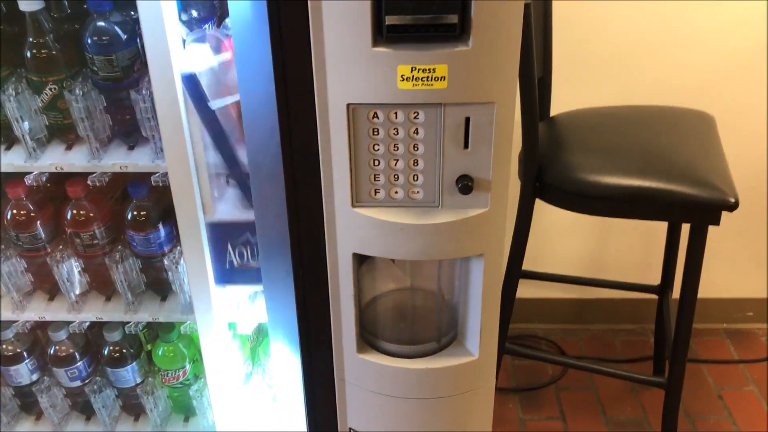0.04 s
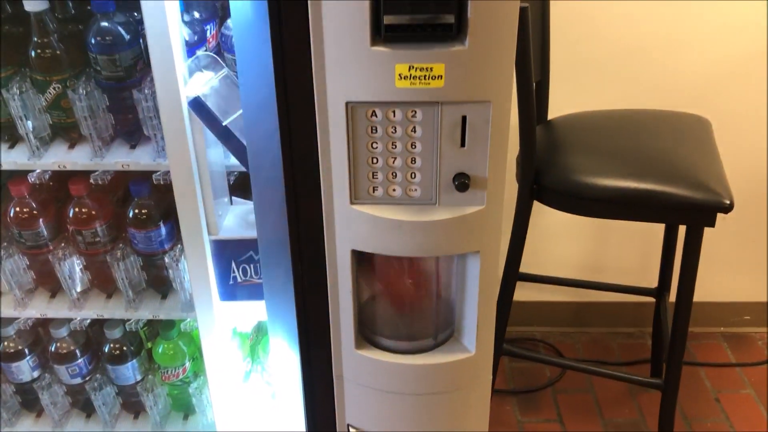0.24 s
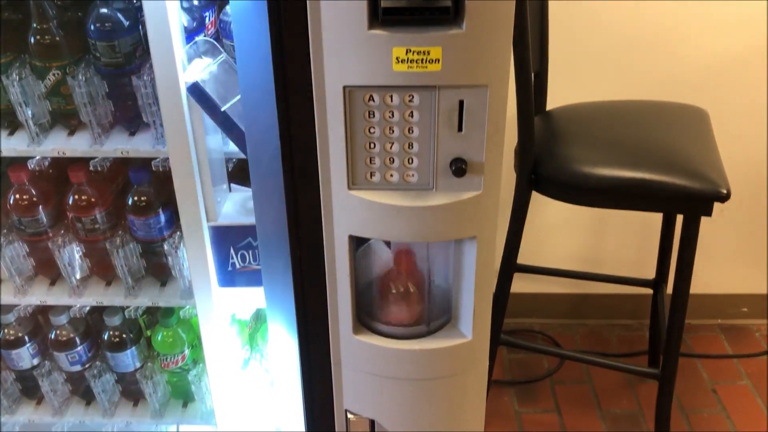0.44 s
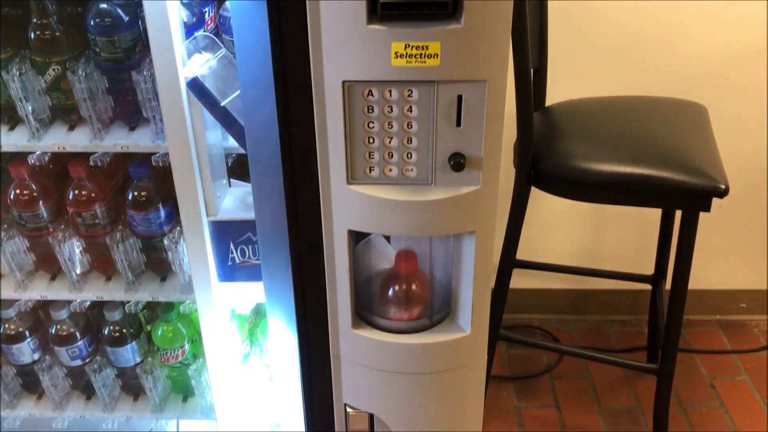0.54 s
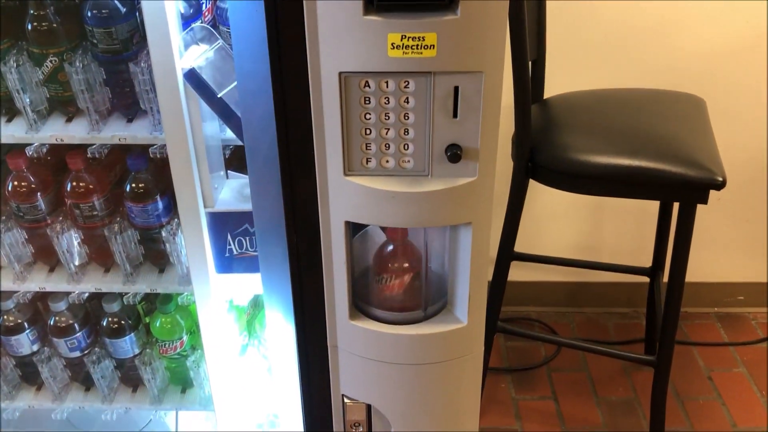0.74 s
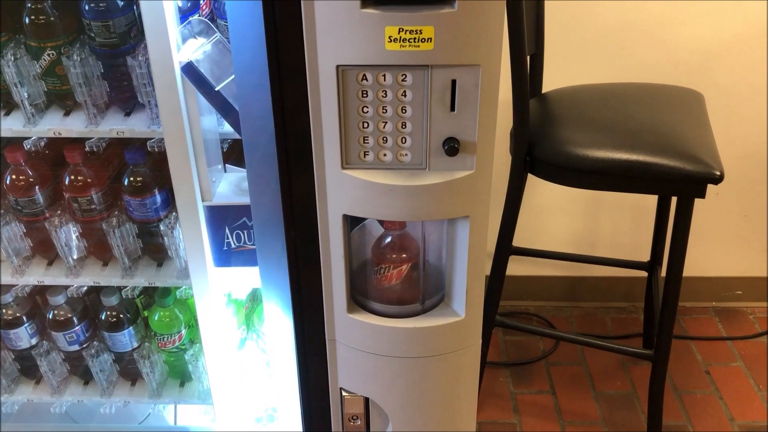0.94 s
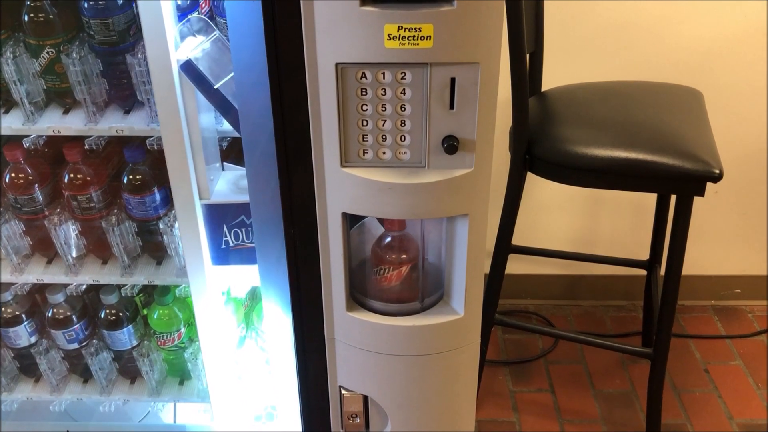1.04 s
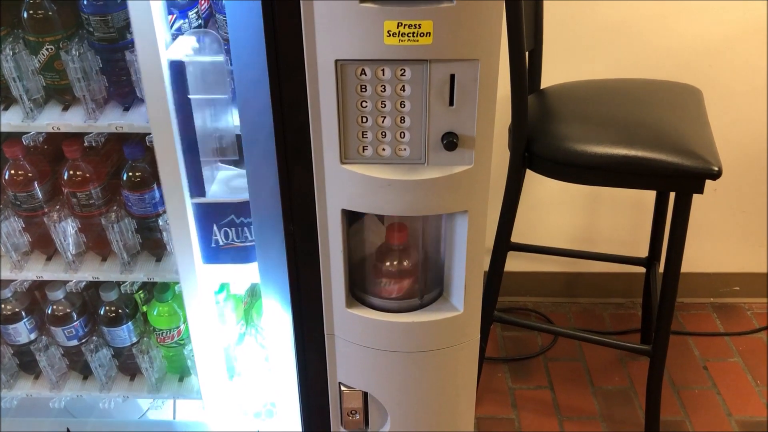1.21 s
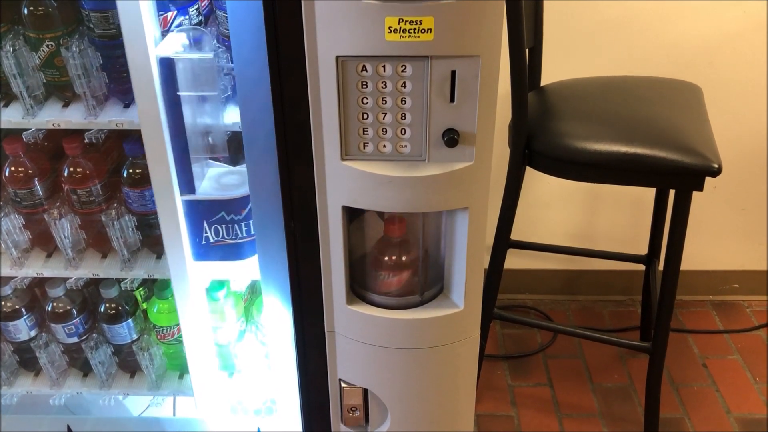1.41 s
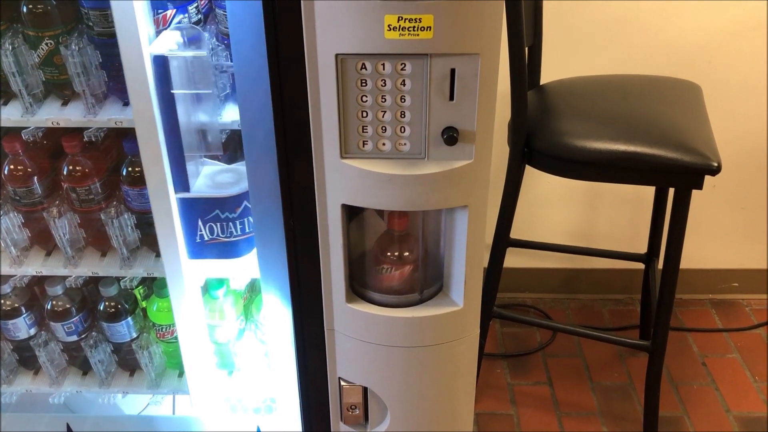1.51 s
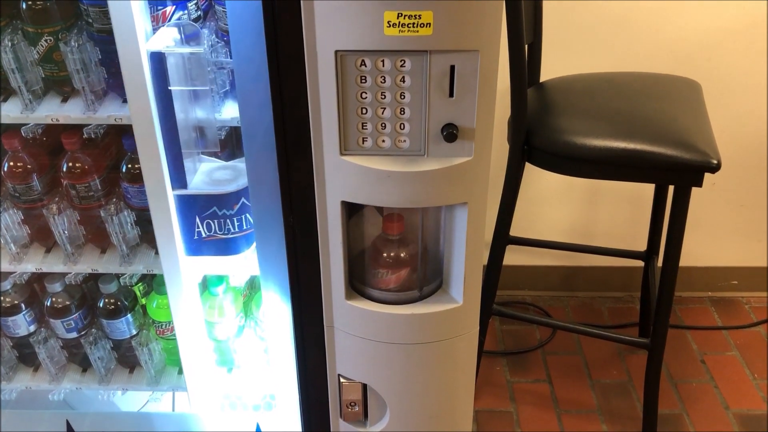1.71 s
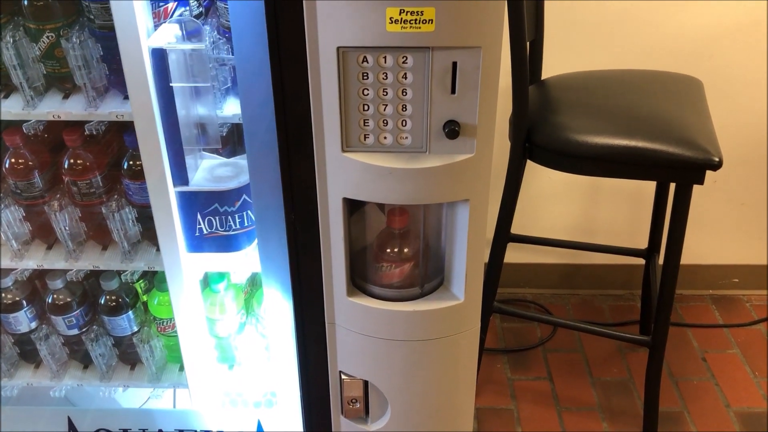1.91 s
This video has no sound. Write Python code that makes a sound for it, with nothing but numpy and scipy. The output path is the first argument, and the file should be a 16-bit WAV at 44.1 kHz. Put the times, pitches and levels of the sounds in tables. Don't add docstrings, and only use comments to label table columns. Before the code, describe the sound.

A full plastic bottle clatters and thuds down into a vending machine's port, then a latch clunks

```python
import sys
import numpy as np
from scipy import signal
from scipy.fft import rfft, irfft
from scipy.io import wavfile
from scipy.ndimage import uniform_filter1d

SR = 44100
rng = np.random.default_rng(int(sys.argv[2]) if len(sys.argv) > 2 else 0)


def linear_from_db(decibels):
    return 10 ** (np.asarray(decibels, float) / 20)


def store_wav(level_fs):
    pcm = np.round(np.clip(np.atleast_2d(level_fs), -1, 1) * 32767)
    wavfile.write(sys.argv[1], SR, pcm.T.astype(np.int16))


N = 85995

# pitch_hz, level_db
COMPRESSOR_TONES = [(156.1, -57.5), (242.2, -62), (371.4, -55), (866.7, -83.5)]
# pitch_hz, level_db
FAN_COLOUR = [(30, -16.5), (70, -6.5), (150, -1.5), (250, 0.5), (380, -3.5), (500, -12), (1500, -25.5),
              (2500, -36), (5000, -39.5), (16000, -61.5)]
# start_s, level_db, body_db, treble_db, chatter_s
BOTTLE_BLOWS = [(0.0792, -41.5, -12, -10.5, 0.014), (0.145, -58, -27, -13.5, 0.0051),
                (0.157, -40.5, -13.5, -12, 0.0063), (0.2258, -22, -22.5, -14, 0.011),
                (0.282, -25.5, -15.5, -3.5, 0.012), (0.2902, -24, 1.5, -18, 0.0042),
                (0.312, -24, 0, -9, 0.008), (0.331, -25.5, -14.5, -22, 0.0072),
                (0.3685, -24.5, -4.5, -31.5, 0.0025), (0.3824, -30.5, 3, -14, 0.016),
                (0.4075, -21.5, -15, -11, 0.013), (0.4192, -33.5, 7, -10.5, 0.012),
                (0.4292, -19, -10, -23, 0.01), (0.4506, -26, 1, -11, 0.019),
                (0.461, -25.5, -11, -9.5, 0.0083), (0.4844, -25.5, -4.5, -16.5, 0.0047),
                (0.508, -36, -18.5, -1.5, 0.0044), (0.5202, -23, -2.5, -34, 0.016),
                (0.5412, -26, 1.5, -22, 0.013), (0.5603, -22.5, -9, -18, 0.005),
                (0.582, -25.5, -14, -40, 0.016), (0.6134, -28.5, 1, -14, 0.012),
                (0.6358, -32, -2, -8.5, 0.0086), (0.6564, -30, -7, -5.5, 0.0036)]
# start_s, level_db, body_db, treble_db, chatter_s
LATCH_CLUNKS = [
    (1.2041, -27, -18, -15.5, 0.0058),
    (1.245, -41, -18, -29.5, 0.0075),
    (1.323, -33.5, -6.5, -9, 0.01),
    (1.3283, -34.5, -8, -3.5, 0.011),
    (1.3674, -29, -40, -6.5, 0.0093),
    (1.3894, -43.5, -10, -15.5, 0.0053),
]
# start_s, peak_db, pitch_hz, t60_s (time to fall 60 dB)
METAL_PINGS = [(.082, -46, 1671, 0.14), (.229, -39, 2010, 0.18), (.229, -38, 1184, 0.043),
               (.288, -27, 588, 0.13), (.29, -28, 3180, 0.055), (.312, -33, 3230, 0.046),
               (.313, -26, 544, 0.051), (.369, -23.5, 2060, 0.017), (.374, -16.5, 938, 0.023),
               (.38, -23.5, 1020, 0.092), (.408, -23, 1320, 0.034), (.41, -23.5, 1009, .06),
               (.445, -21, 1022, 0.055), (.464, -24, 570, 0.076), (.465, -32, 6500, 0.035),
               (.465, -33.5, 10000, 0.051), (.523, -25, 997, 0.092), (.556, -27, 596, 0.065),
               (.586, -24.5, 1007, 0.056), (.664, -25.5, 646, 0.059), (.69, -34.5, 790, 0.055),
               (1.132, -60, 3410, 0.021), (1.14, -64, 1350, 0.16), (1.206, -35, 877, 0.13),
               (1.206, -38, 2622, 0.15), (1.206, -45, 1660, 0.044), (1.206, -41.5, 4374, 0.11),
               (1.206, -48, 5250, 0.11), (1.328, -39.5, 5200, 0.051), (1.37, -59, 5080, 0.36),
               (1.37, -52, 1484, 0.37), (1.37, -52, 2040, 0.32), (.508, -35, 5140, 0.022),
               (.617, -33, 2480, 0.029)]
# start_s, peak_db, pitch_hz, t60_s
PANEL_THUMPS = [(.283, -23, 82, 0.11), (.402, -32, 86, .1), (.432, -16.5, 150, 0.066),
                (.442, -19.5, 74.6, 0.091), (.452, -23.5, 359, .07), (.606, -20, 170, 0.061),
                (.61, -24, 88.5, 0.13), (.632, -25.5, 162, .09), (.59, -28, 357, 0.075),
                (.645, -32, 425, 0.085), (.3, -31.5, 257, 0.11), (.68, -44, 111, 0.059),
                (.72, -34, 79, 0.1), (1.215, -42, 80, 0.18), (1.262, -40, 65, 0.14),
                (1.288, -42, 83.5, 0.16), (1.325, -37, 446, 0.066), (1.343, -31.5, 430, 0.14),
                (1.343, -34, 202, 0.047), (1.368, -30, 277, 0.06), (.408, -25, 230.5, 0.14),
                (1.385, -34.5, 60, 0.13), (1.394, -31, 233, 0.053), (1.413, -35, 283, 0.15),
                (1.432, -40, 131.6, 0.17), (1.388, -34, 171, .08), (1.41, -34, 185, 0.12)]
# time_s, level_db
RATTLE_CURVES = [
    [(.085, -56.5), (.14, -52.5), (.22, -46.5), (.27, -41), (.355, -38.5), (.45, -36.5), (.6, -34.5),
     (.68, -40.5), (.76, -80)],
    [(1.21, -42), (1.27, -52), (1.31, -55), (1.35, -40.5), (1.42, -48.5), (1.5, -74.5)],
]
# start_s, level_db, contact_s
CABINET_THUDS = [(0.1, -34.5, 0.0046), (0.149, -35.5, 0.004), (0.19, -34.5, 0.0026), (0.287, -28.5, 0.0039),
                 (0.321, -38, 0.0031), (.38, -29.5, 0.0021), (0.411, -29.5, 0.0036), (.437, -36, 0.0034),
                 (0.454, -33.5, 0.0032), (0.534, -45, 0.0094), (0.556, -30, 0.004), (.612, -34.5, 0.0017),
                 (0.659, -29.5, 0.0046), (0.722, -36, 0.0045), (1.217, -45, 0.0045), (1.255, -36.5, 0.0034),
                 (1.299, -28, 0.0066), (1.334, -37, 0.0048), (1.371, -38.5, 0.002), (1.393, -33, 0.0047),
                 (1.442, -40, 0.0029)]
# start_s, level_db
LOOSE_TICKS = [(.138, -48.5), (.187, -55), (0.263, -43), (0.702, -57), (0.75, -64), (0.8, -58.5),
               (.833, -62), (0.872, -59.5), (0.933, -65), (1.094, -73), (1.128, -57.5), (1.189, -66),
               (1.312, -50.5)]
# pitch_hz, level_db
CHUTE_LOW = [(517, -1), (586, -1), (683, 1), (716, -5), (830, -3.5), (921, -1.5), (964, -5.5), (1023, -2.5),
             (1081, -8), (1190, -3.5), (1257, -22.5), (1311, 2.5)]
CHUTE_BRIGHT = [(1556, -7), (1706, 4.5), (1884, -2.5), (2005, 2.5), (2190, -21), (2595, -4.5), (2750, -5),
                (3150, 4.5), (3430, 3.5), (4050, -0.5), (4600, -3), (5200, 1), (5650, -17)]
LATCH_LOW = [(430, -4.5), (475, -4.5), (578, -11), (668, -5), (775, -5), (891, -4.5), (983, -2), (1204, -4)]
LATCH_BRIGHT = [(1405, -3), (1640, -1), (1971, -3), (2351, -16.5), (2592, -23.5), (2700, -15.5), (3350, -7),
                (4253, -1), (4390, -2.5), (4823, 1), (5243, -8), (6000, -26.5), (6428, -21)]
# pitch_hz, level_db
CABINET_PANELS = [(57, -10), (68, -12), (78, -8), (95, -10), (112, -10.5), (141, -6), (158, -4), (197, 0.5),
                  (233, 0), (281, -1), (308, 1.5), (374, 7), (430, 1), (500, -10.5)]
# pitch_hz, level_db
CRACK_COLOUR = [(300, 7), (1000, -1.5), (1600, -6), (3200, -9.5), (6000, -17), (10000, -21.5),
                (16000, -24.5)]
# pitch_hz, t60_s
ROOM_ECHO = [(60, 0.46), (250, 1), (1000, 0.58), (4000, 0.7), (12000, 0.2)]

FAN_DB, FAN_FLICKER_DB, HUM_DB, HUM_WOBBLE_DB, HUM_DRIFT = -55, 1, 1.5, 1.2, .003
BODY_DB, SHEET_DB, CRACK_DB, TREBLE_DB = -8, -11, -8.5, -5.5
BODY_T60_S, CRACK_T60_S, TREBLE_T60_S, CABINET_T60_S = 0.062, 0.046, 0.0089, 0.22
MODE_SPREAD_DB, DETUNE, BASS_SUSTAIN = 2, .015, .5
CHATTER_PER_S, CHATTER_FADE_S, GRAIN_SPREAD_DB = 3500, 0.007, 2.4
RATTLE_PER_S, RATTLE_DB, RUMBLE_DB = 6000, -3.5, -1
THUD_DB, TICK_DB, TICK_S = 30, -9.5, 0.011
RISE_CYCLES = 0.93
ROOM_DB = -17.5

# low body, bright sheet, sheet t60_s, sheet_db, lowest crack_hz
CHUTE = (CHUTE_LOW, CHUTE_BRIGHT, .045, -3, 620)
LATCH = (LATCH_LOW, LATCH_BRIGHT, .05, -3, 828)


def unit(x):
    return x / np.sqrt(np.mean(x ** 2))


def colour(x, table):
    hz = np.fft.rfftfreq(len(x), 1 / SR)
    f, db = np.array(table).T
    gain = linear_from_db(np.interp(np.log(hz + 1), np.log(f), db))
    return irfft(rfft(x) * gain, len(x))


def band(x, lo_hz, hi_hz):
    sos = signal.butter(2, [lo_hz, min(hi_hz, SR / 2.2)], "band", fs=SR, output="sos")
    return signal.sosfilt(sos, x)


def walk(rate):
    k = int(SR / rate)
    stairs = np.repeat(rng.standard_normal(size=100), k)
    return 0.76 * uniform_filter1d(uniform_filter1d(stairs, k), k)[:N]


def decay(t60, size):
    return np.exp(-np.log(1000) * np.arange(size) / SR / np.abs(t60))


def add(out, at_s, x):
    i = int(at_s * SR)
    out[i:i + len(x)] += x[:N - i]


def cooler():
    t = np.arange(N) / SR
    tones = np.zeros(N)
    for hz, db in COMPRESSOR_TONES:
        level = linear_from_db(db + HUM_DB + HUM_WOBBLE_DB * walk(13.5))
        drift = np.cumsum(HUM_DRIFT * walk(16)) / SR
        tones += level * np.sin(2 * np.pi * hz * (t + drift))
    noise = colour(rng.standard_normal(N), FAN_COLOUR)
    air = np.zeros(N)
    for hz in 28 * np.sqrt(2) ** np.arange(19):
        air += band(noise, hz, 2 * hz) * linear_from_db(FAN_FLICKER_DB * walk(12.16))
    return tones + linear_from_db(FAN_DB) * unit(air)


def grains(per_s, size):
    u = rng.random((3, size))
    hits = u[0] < per_s / SR
    force = linear_from_db(-GRAIN_SPREAD_DB * np.log(u[2] + 0.00074))
    return unit(hits * np.sign(u[1] - .5) * force)


def chatter(length, size=3000):
    force = grains(CHATTER_PER_S, size)
    force[0] = 5
    shape = np.exp(-np.maximum(np.arange(size) / SR - length, 0) / CHATTER_FADE_S)
    return unit(force * shape) * np.sqrt(np.mean(shape ** 2))


def ring(modes, t60, size=6144):
    f, db = np.array(modes).T[:, :, None]
    chance = rng.standard_normal((3, len(modes), 1))
    turning = 2j * np.pi * f * (1 + DETUNE * chance[1])
    fading = np.log(1000) / t60 * (f / f.mean()) ** BASS_SUSTAIN
    strength = linear_from_db(db + MODE_SPREAD_DB * chance[0]) * np.sign(chance[2])
    y = strength * np.exp((turning - fading) * np.arange(size) / SR).imag
    return unit(y.sum(axis=0)) / np.sqrt(size)


def burst(t60, shape, size=2048):
    z = rfft(rng.standard_normal(size) * decay(t60, size))
    even = irfft(z / np.abs(z), size)
    return unit(shape(even) * decay(2 * t60, size)) / np.sqrt(size)


def strike(metal, body_db, treble_db):
    body, sheet, sheet_t60, sheet_db, crack_hz = metal
    y = linear_from_db(BODY_DB + body_db) * ring(body, BODY_T60_S)
    y += linear_from_db(SHEET_DB + sheet_db) * ring(sheet, sheet_t60)
    crack = burst(CRACK_T60_S, lambda v: band(colour(v, CRACK_COLOUR), crack_hz, 8740))
    treble = burst(TREBLE_T60_S, lambda v: band(colour(v, CRACK_COLOUR), 5300, 14000))
    y[:len(crack)] += linear_from_db(CRACK_DB) * crack + linear_from_db(TREBLE_DB + treble_db) * treble
    return y


def blows(table, metal):
    out = np.zeros(N)
    for s, db, body_db, treble_db, length in table:
        hit = signal.fftconvolve(chatter(length), strike(metal, body_db, treble_db))
        add(out, s - .001, linear_from_db(db) * hit)
    return out


def rings(table):
    out, t = np.zeros(N), np.arange(8192) / SR
    for s, db, hz, t60 in table:
        rise = 1 - np.exp(-t * hz / RISE_CYCLES * 2)
        add(out, s - .001, linear_from_db(db) * rise * decay(t60, size=8192) * np.sin(2 * np.pi * hz * t))
    return out


def rattle(metals, count=4):
    out, t = np.zeros(N), np.arange(N) / SR
    for curve, metal in zip(RATTLE_CURVES, metals):
        s, db = np.array(curve).T
        for _ in range(count):
            level_db = RATTLE_DB + np.interp(t, s, db, -120, -120) + 2.77 * walk(29.7)
            force = grains(RATTLE_PER_S / count, N) * linear_from_db(level_db)
            out += signal.fftconvolve(force, strike(metal, 3.25, -15.5))[:N]
    return out


def rumble():
    t, shake = np.arange(N) / SR, np.zeros(N)
    for curve in RATTLE_CURVES:
        s, db = np.array(curve).T
        shake += linear_from_db(RUMBLE_DB + np.interp(t, s, db, -120, -120))
    return signal.fftconvolve(shake * rng.standard_normal(N), ring(CABINET_PANELS, CABINET_T60_S))[:N]


def thuds():
    out, t = np.zeros(N), np.arange(800) / SR
    for s, db, contact in CABINET_THUDS:
        push = np.sin(np.pi * np.clip(t / contact, 0, 1)) ** 2
        boom = signal.fftconvolve(push / push.sum(), ring(CABINET_PANELS, CABINET_T60_S))
        add(out, s, linear_from_db(db + THUD_DB) * boom)
    return out


def ticks():
    out = np.zeros(N)
    for s, db in LOOSE_TICKS:
        flutter = signal.fftconvolve(chatter(TICK_S), burst(.025, lambda v: band(v, 700, 13000)))
        add(out, s, linear_from_db(db + TICK_DB) * flutter)
    return out


def room(x):
    size = SR
    f, t60 = np.array(ROOM_ECHO).T
    tail = np.zeros(size)
    for hz in 44 * 2. ** np.arange(9):
        octave = unit(band(rng.standard_normal(size), hz / 1.48, hz * 1.346))
        octave_t60 = np.interp(np.log(hz), np.log(f), t60)
        tail += octave * np.sqrt(hz) * decay(octave_t60, size)
    tail *= np.minimum(np.arange(size) / SR / 0.02, 1)
    return linear_from_db(ROOM_DB) * signal.fftconvolve(x, unit(tail) / np.sqrt(size))[:N]


def scene():
    hum = cooler()
    machine = blows(BOTTLE_BLOWS, CHUTE) + blows(LATCH_CLUNKS, LATCH)
    machine += rings(METAL_PINGS) + rings(PANEL_THUMPS)
    machine += rattle((CHUTE, LATCH)) + rumble() + thuds() + ticks()
    return (machine + room(machine) + hum)[None]


def band_limit(x):
    return signal.sosfilt(signal.butter(12, 16250, fs=SR, output="sos"), x)


def record(dry):
    x = np.tanh(2.585 * dry) / 2.476
    x = signal.sosfilt(signal.butter(5, 50, "high", fs=SR, output="sos"), x)
    x = signal.sosfilt(signal.ellip(10, .2, 70, 16300, fs=SR, output="sos"), x)
    return band_limit(x)


dry = scene()
out = record(dry)
store_wav(out)
```